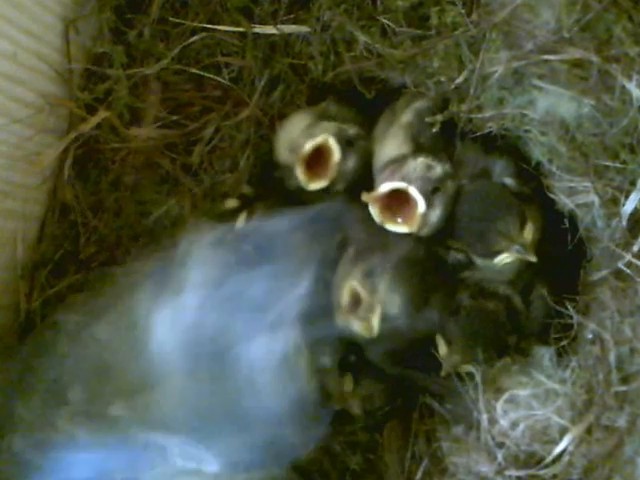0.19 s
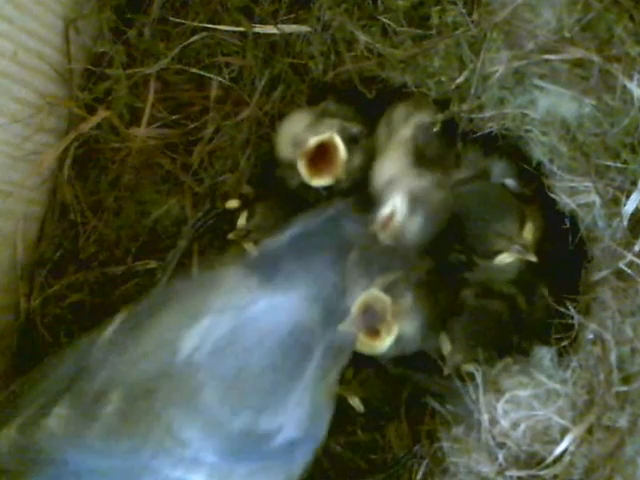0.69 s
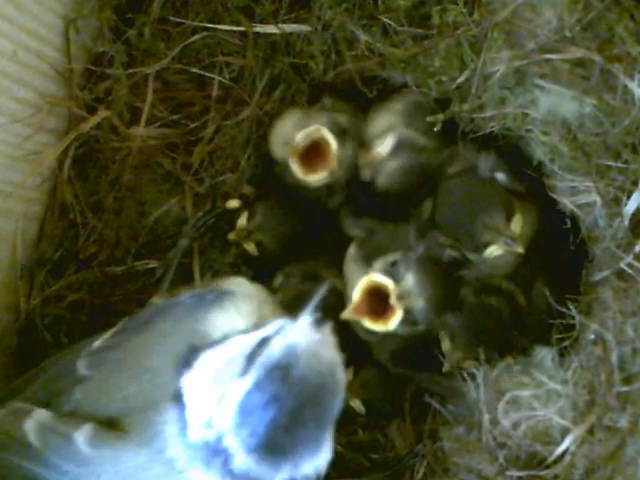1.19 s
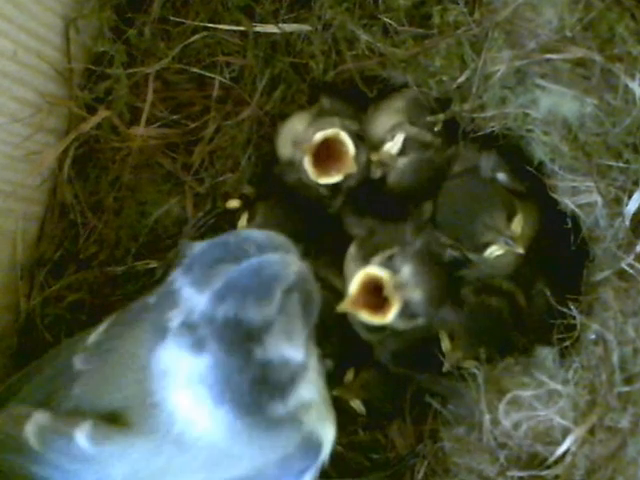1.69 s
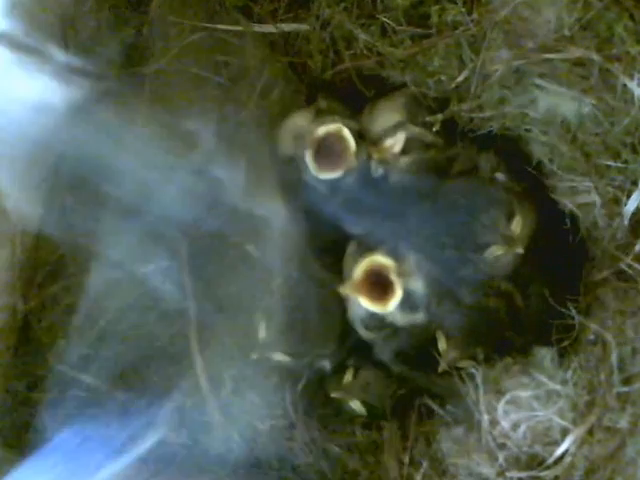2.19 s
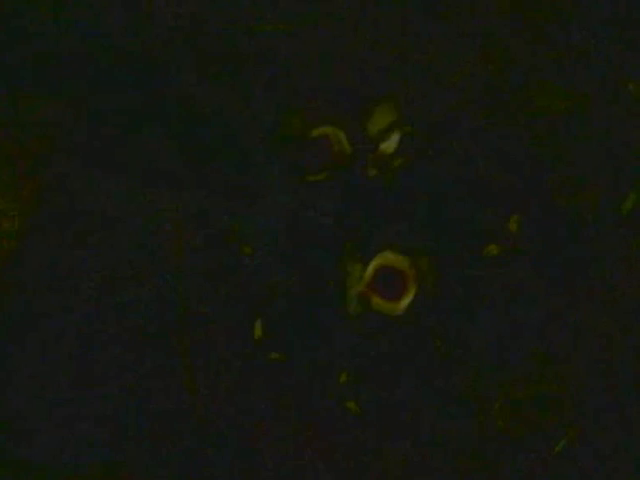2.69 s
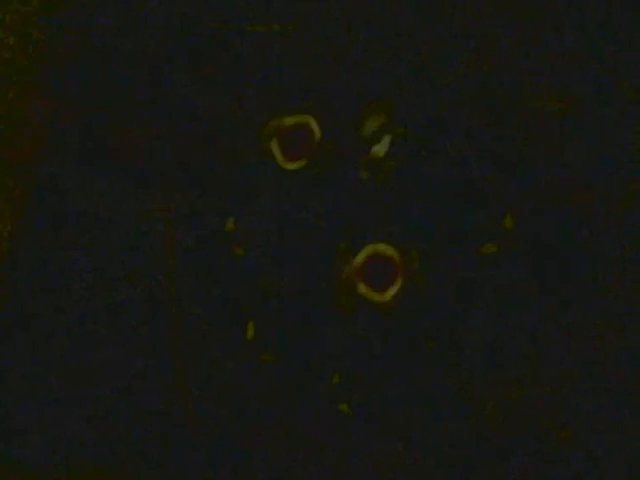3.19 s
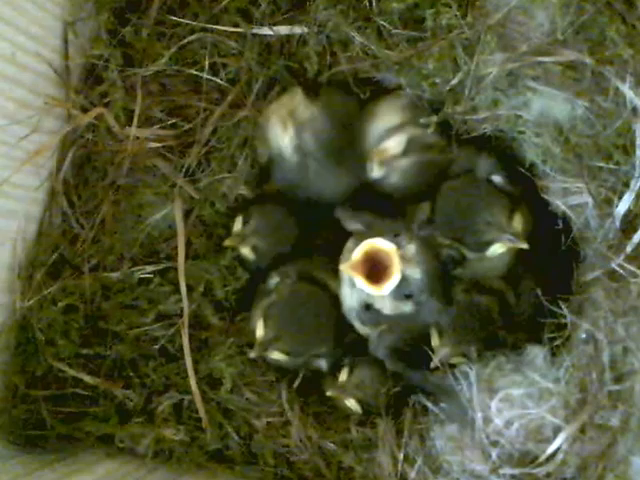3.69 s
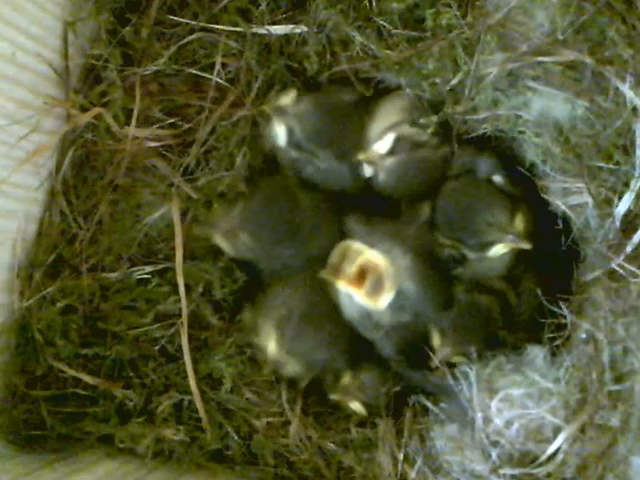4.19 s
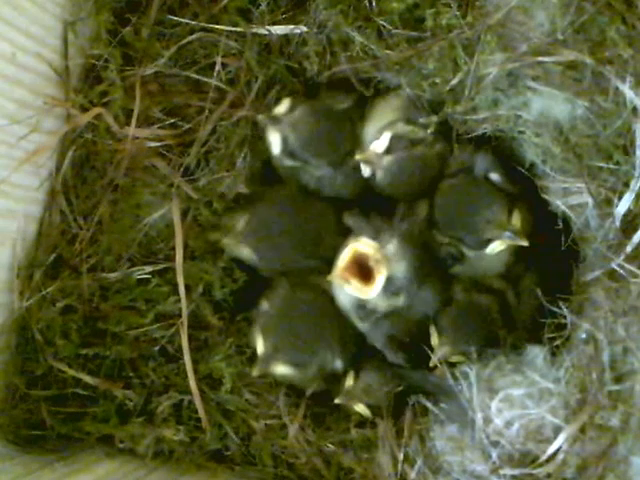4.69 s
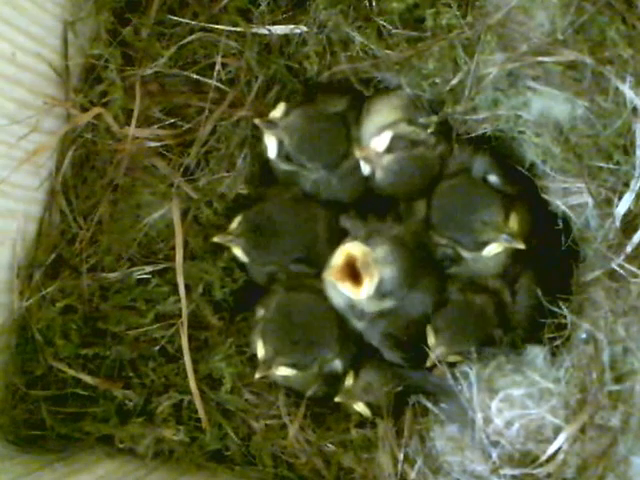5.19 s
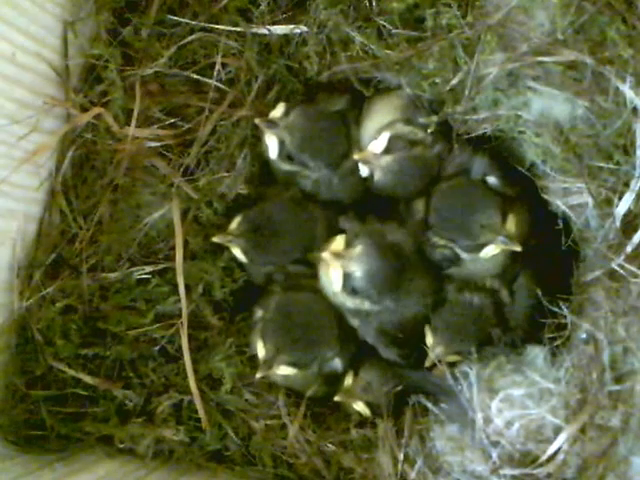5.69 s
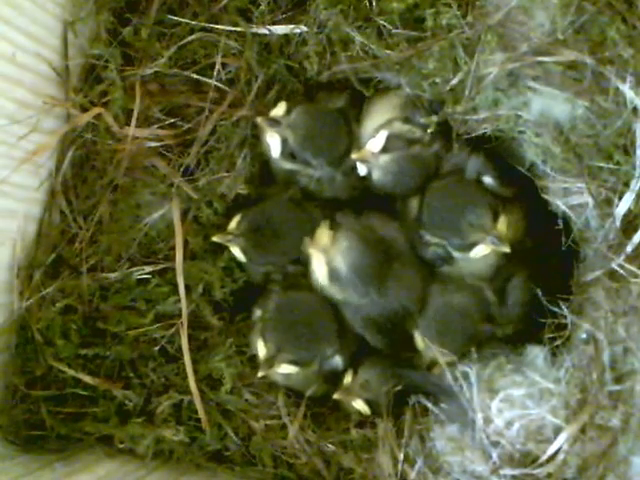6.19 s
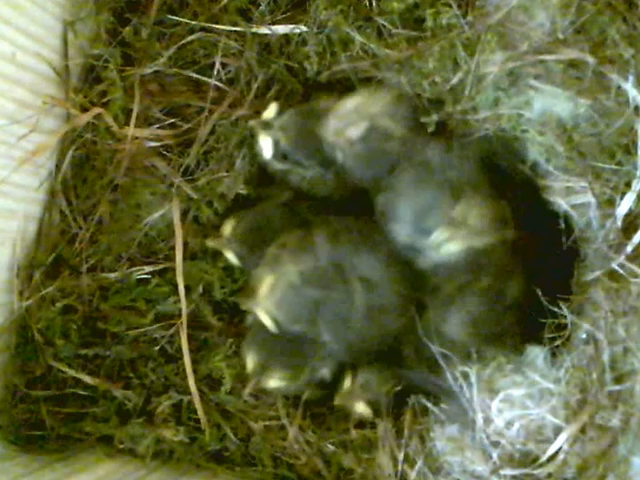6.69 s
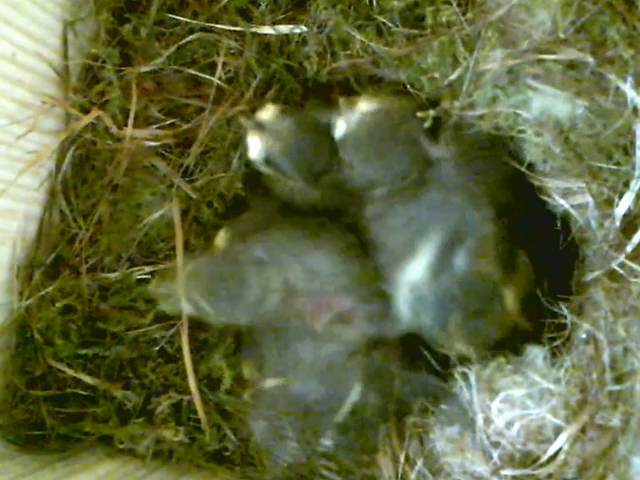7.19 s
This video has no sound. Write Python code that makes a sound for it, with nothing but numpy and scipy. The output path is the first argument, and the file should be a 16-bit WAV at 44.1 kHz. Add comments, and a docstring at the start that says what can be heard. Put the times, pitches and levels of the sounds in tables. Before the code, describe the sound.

Crowded nestlings beg with harsh, rasping high cheeps and buzzy chirps inside a small nest box, first frantic, then thinning to separate shrill calls.

```python
"""Nestlings begging in a nest box

Rasps (chaotic tone and throbbing noise), two-voiced buzzes, chirps and short octave-rich notes (harmonic
stacks) and thin whistles overlap close to one microphone. The box air hums low (shaped noise), claws knock
on the wood (dying modes and scrapes) and bodies shuffle in the moss (dull noise bursts).
"""
import sys
import numpy as np
from scipy import signal
from scipy.fft import rfft, irfft, next_fast_len
from scipy.io import wavfile
from scipy.ndimage import uniform_filter1d

SR = 44100
rng = np.random.default_rng(int(sys.argv[2]) if len(sys.argv) > 2 else 0)


def wav_record(signal):
    """Record a signal, one row per channel, as 16-bit PCM in the file named by sys.argv[1]."""
    frames = np.transpose(np.atleast_2d(signal))
    bounded = np.clip(frames, -1, 1)
    # unit amplitude maps onto the largest positive 16-bit level
    quanta = np.round(bounded * 32767).astype(np.int16)
    wavfile.write(sys.argv[1], SR, quanta)


N = 329868


def gain_of(db):
    """Decibels to an amplitude factor."""
    return 10 ** (np.asarray(db) / 20)


def evened(x):
    """Scales to rms 1."""
    return x / np.sqrt(np.mean(x ** 2) + 1e-20)


def read(points, hz):
    """Spectrum table interpolated over log frequency."""
    table_hz, value = np.transpose(points)
    return np.interp(np.log(hz + 1), np.log(table_hz + 1), value)


def add(mix, s, sound):
    """Mixes a sound in at time s, in place."""
    part = mix[round(s * SR):][:len(sound)]
    part += sound[:len(part)]


def coloured(x, gain):
    """Filters x by a gain given as a function of Hz."""
    size = next_fast_len(len(x) + 512)
    return irfft(rfft(x, size) * gain(np.fft.rfftfreq(size, 1 / SR)), size)[:len(x)]


def wander(noise, top_hz):
    """Slow random drift of rms 1: noise low-passed near top_hz."""
    return evened(coloured(noise, lambda hz: 1 / (1 + (hz / top_hz) ** 4)))


def peak(hz, mid_hz, width_hz):
    """Resonance curve of height 1."""
    return 1 / (1 + (2 * (hz - mid_hz) / width_hz) ** 2)


# hum swells, before the lumps: (time [s], level [dB])
HUM_SWELLS = [(0, -43), (.5, -31.5), (0.899, -39), (1.75, -41.5), (1.98, -26.5), (2.148, -38), (6.2, -40),
              (7.48, -39.5)]
# rumble spectrum, before the cavity resonance: (frequency [Hz], relative density [dB])
HUM_SPECTRUM = [(18, -44), (30, -25), (249, -3.5), (315, -15), (420, -37), (709, -23.5), (1020, -43.5),
                (1510, -33.5), (1680, -41.5), (15500, -57)]


def hum():
    """Outside rumble swells in the air cavity of the box, resonant near 211 Hz; it comes in lumps."""
    s, db = np.transpose(HUM_SWELLS)
    swell_db = np.interp(np.arange(N) / SR, s, db)
    lumps = gain_of(swell_db + 3.6 * wander(rng.standard_normal(N), 9.0))

    def cavity(hz):
        return gain_of(read(HUM_SPECTRUM, hz)) * (1 + 2.66 * peak(hz, 211.5, 28))

    return lumps * evened(coloured(rng.standard_normal(N), cavity))


# nestlings shuffle in the moss: (time [s], level before the fade window [dB])
SHUFFLES = [(2.22, -32.5), (6.3, -35.5), (6.53, -38.5), (6.71, -34.5), (6.985, -45), (7.035, -40.5),
            (7.16, -47), (7.365, -41)]


def shuffles():
    """Short dull rustles of bodies against the lining: noise around 648 Hz."""
    out, size = np.zeros(N), round(.035 * SR)
    for s, db in SHUFFLES:
        rustle = evened(coloured(rng.standard_normal(4000), lambda hz: peak(hz, 648, 480) ** 2))
        add(out, s, gain_of(db) * rustle[:size] * np.hanning(size))
    return out


def ring(modes, rise_s):
    """Dying modes after a soft blow."""
    t = np.arange(8000) / SR
    tones = sum(gain_of(db - 60 * t / t60) * np.sin(2 * np.pi * hz * t) for hz, db, t60 in modes)
    return (1 - np.exp(-t / rise_s)) * tones


# claws on the wood: (time [s], gain of the thump [dB], gain of wall ring and scrape [dB])
KNOCKS = [(2.526, -13, -16), (2.74, -51, -27), (2.904, -15, -20.5), (2.928, 0, -18), (3.206, -4.5, -26),
          (3.229, -0.5, -23), (3.254, -6.5, -15.5), (3.279, -12, -21.5), (3.574, -28, -19),
          (3.599, -7, -18), (3.624, -4.5, -38), (3.647, 8, -44), (3.689, -4, -46)]
# modes of the box air: (frequency [Hz], relative level [dB], t60 [s])
AIR_MODES = [(200.3, 12, 0.044), (271, -1.5, 0.05), (88.2, -7, 0.082)]
# modes of the wall: (frequency [Hz], relative level [dB], t60 [s])
WALL_MODES = [(538.7, 2, 0.12), (496, -10, 0.062)]


def knocks():
    """Each blow pushes the air of the box, rings a wall and scrapes briefly."""
    out, t = np.zeros(N), np.arange(8000) / SR
    for s, thump_db, wall_db in KNOCKS:
        scrape = coloured(rng.standard_normal(8000), lambda hz: peak(hz, 330, 5000) ** 2)
        scrape = scrape * gain_of(-60 * t / 0.071) * np.minimum(t * 100, 1)  # 10 ms rise
        wall = ring(WALL_MODES, rise_s=0.0055) + gain_of(11) * scrape
        add(out, s, gain_of(thump_db) * ring(AIR_MODES, rise_s=0.029) + gain_of(wall_db) * wall)
    return out


def phase(length, pitches_hz, flick_hz, waver_hz, warble_hz, flick_s=0.0024):
    """Running phase of a note that passes through its pitches, warbles, wavers and flicks at the end."""
    t = np.arange(round(length * SR)) / SR
    hz = np.interp(t / length, np.linspace(0, 1, len(pitches_hz)), pitches_hz)
    hz = uniform_filter1d(hz, size=150, mode="nearest")
    hz = hz + flick_hz * np.exp((t - length) / flick_s)
    hz = hz + waver_hz * wander(rng.standard_normal(6000), 43)[:len(t)]
    hz = hz + warble_hz * np.sin(2 * np.pi * 52 * (t - length))
    return 2 * np.pi * np.cumsum(hz) / SR


def partials(turn, levels_db):
    """Harmonics of one phase."""
    return np.sqrt(2) * sum(gain_of(db) * np.sin((k + 1) * turn) for k, db in enumerate(levels_db))


def swell(size):
    """Envelope with a rounded top, a little past the middle."""
    return np.sin(np.pi * np.linspace(0, 1, size) ** 1.3) ** .6


# thin whistles: (time [s], length [s], first pitch [Hz], last pitch [Hz], gain [dB])
WHISTLES = [(0.052, 0.036, 5750, 6530, -17), (0.35, 0.035, 6930, 6800, -28), (0.71, 0.058, 5430, 5540, -35),
            (0.96, .085, 5600, 5830, -31), (1.544, 0.083, 5670, 6620, -31), (2.548, 0.022, 4970, 6420, -10),
            (2.379, .025, 6120, 5250, -14.5), (2.201, .075, 5700, 6370, -26.5),
            (2.811, 0.028, 6400, 5930, -41), (3.682, .042, 5900, 5900, -24), (3.968, 0.03, 5190, 6130, -7),
            (4.197, 0.059, 5850, 6200, -33), (4.567, .06, 6400, 6040, -35.5), (4.788, .1, 5800, 6540, -28),
            (5.039, .056, 5880, 6140, -33), (5.57, 0.051, 5900, 5800, -35),
            (5.882, 0.09, 6540, 5900, -26.5), (5.925, 0.021, 4450, 4240, -40),
            (6, 0.039, 6420, 5980, -26.5), (6.2, 0.052, 7200, 6960, -35), (6.57, 0.092, 2120, 1940, -54),
            (6.58, 0.029, 6220, 6430, -33), (6.666, 0.11, 7500, 6200, -44), (6.737, .053, 5720, 6030, -31),
            (6.794, .092, 3690, 3550, -47.5), (6.89, 0.023, 3430, 5950, -14),
            (6.95, 0.064, 7250, 6630, -34), (6.977, 0.066, 5650, 6000, -32.5),
            (7.19, .062, 6500, 7330, -28), (7.234, 0.076, 5960, 5880, -33.5),
            (7.389, 0.087, 2500, 2640, -46.5)]
# wide air noise, also in the rasps: (frequency [Hz], relative density [dB])
BREATH_SPECTRUM = [(450, -47), (750, -34), (1200, -28), (1900, -32), (2700, -28), (5300, -16), (8800, -19),
                   (10400, -31), (12300, -32.5), (15500, -40.5)]


def whistle(s, length, first_hz, last_hz, level_db):
    """A wavering near-sine with a weak octave and a little air."""
    high = (first_hz + last_hz) / 12000  # higher notes waver more and show more octave
    turn = phase(length, [first_hz, last_hz], flick_hz=0, waver_hz=50 * high, warble_hz=80 * high)
    slow_db = 3.7 * wander(rng.standard_normal(6000), 90)[:len(turn)]
    fast_db = 1.2 * wander(rng.standard_normal(6000), 550)[:len(turn)]
    air = evened(coloured(rng.standard_normal(6000), lambda hz: gain_of(read(BREATH_SPECTRUM, hz))))
    tone = partials(turn, [0, -27 + 20 * np.log(high)]) * gain_of(slow_db + fast_db)
    note = tone + gain_of(-26.5) * air[:len(turn)]
    return gain_of(level_db) * note * signal.windows.tukey(len(turn), .25)


SHUT_HZ, SHUT_S, SHUT_FALL_HZ = 7260, 0.0093, 342


def shut(level_db):
    """The folds close on a short, clear, falling note."""
    turn = phase(SHUT_S, [SHUT_HZ, SHUT_HZ - SHUT_FALL_HZ], flick_hz=0, waver_hz=60, warble_hz=0)
    return gain_of(level_db) * np.sin(turn) * np.hanning(len(turn))


SCOOP, OVERSHOOT = .94, 1.03  # shares of the held pitch: a chirp starts under it and swings past it
# clear chirps: (time [s], length [s], held pitch [Hz], last pitch before the flick [Hz], gain [dB])
CHIRPS = [(0.035, 0.059, 3135, 3620, -26.5), (0.122, 0.046, 3156, 3200, -24.5),
          (0.227, 0.052, 3044, 3600, -26), (0.796, 0.053, 3030, 3250, -28),
          (0.988, 0.044, 3140, 3300, -27.5), (1.154, 0.047, 3010, 3930, -27.5),
          (1.33, 0.054, 3040, 3370, -26.5), (1.5, 0.052, 3046, 3740, -27), (1.667, 0.032, 3024, 3600, -27),
          (1.826, 0.057, 3090, 3370, -26), (1.998, 0.061, 3130, 3080, -25), (2.261, 0.019, 3120, 3520, -33),
          (2.622, 0.017, 3080, 3400, -28.5), (2.779, 0.04, 3095, 4000, -28.5),
          (3.281, 0.017, 2960, 3850, -27.5), (3.67, 0.016, 2990, 3610, -33), (4.25, 0.033, 3070, 3670, -29),
          (4.387, 0.034, 3040, 3400, -32), (7.186, 0.013, 3255, 3550, -33.5)]


def chirp(s, length, held_hz, last_hz, level_db):
    """A clear stack of four harmonics with an upward flick and a closing note."""
    pitches_hz = [SCOOP * held_hz, OVERSHOOT * held_hz, held_hz, held_hz, held_hz, last_hz]
    turn = phase(length, pitches_hz, flick_hz=948, waver_hz=38.4, warble_hz=94.5, flick_s=0.00364)
    note = partials(turn, [5.0, 0, -3.5, -12]) * signal.windows.tukey(len(turn), .3)
    note = np.append(note, np.zeros(round(SHUT_S * SR)))
    add(note, length - .004, shut(level_db=15.5))
    return gain_of(level_db) * note


# short notes with a strong octave; most glide up steeply, the last stays nearly level:
# (time [s], length [s], first pitch [Hz], last pitch [Hz], gain [dB])
OCTAVE_NOTES = [(2.226, 0.034, 2880, 3870, -23.5), (2.547, 0.008, 2700, 3400, -31),
                (2.603, 0.023, 3980, 4460, -28), (3.942, 0.035, 3034, 4560, -19.5),
                (6.059, 0.041, 3590, 3570, -19)]


def octave_note(s, length, first_hz, last_hz, level_db):
    """A short, slightly hoarse note with a strong octave; its pitch moves faster in the second half."""
    middle_hz = first_hz + 0.39 * (last_hz - first_hz)
    turn = phase(length, [first_hz, middle_hz, last_hz], flick_hz=0, waver_hz=40.4, warble_hz=0)
    hoarse = gain_of(1.2 * wander(rng.standard_normal(6000), 300)[:len(turn)])
    return gain_of(level_db) * partials(turn, [-1, -2, -16]) * hoarse * swell(len(turn))


PARENT_GONE_S = 3.8
SWEEP_S, SETTLE_SHARE = 0.0037, 0.17  # time constant of the final sweep; share of the pitch change left midway
HOARSE_RAD, ALONE_HOARSE_RAD = .12, .4  # rms of the fast phase shake, with and without the parent
# both sides of the syrinx lock on notes: (time [s], length [s], first pitch [Hz], last pitch [Hz],
# upper voice above by [Hz], final sweep [Hz], sum tones [dB], gain [dB])
BUZZES = [(0.42, 0.053, 3330, 3500, 459, 104, 7, -16), (.495, 0.045, 3600, 3440, 545, -300, -24, -17.5),
          (0.595, 0.104, 3363, 3537, 488, -150, 4, -14), (1.259, 0.052, 3255, 3450, 480, 498, 7, -19),
          (1.424, 0.079, 3340, 3640, 385, 52, 3.5, -14), (2.152, 0.069, 3375, 3500, 501, 1400, 12, -20.5),
          (2.331, 0.084, 3340, 3390, 423.5, 702, 5, -13.5), (2.517, 0.08, 3430, 3430, 298, -100, 5.5, -14),
          (2.715, 0.088, 3330, 3373, 299, -52, -3.5, -15), (3.387, 0.051, 3310, 3375, 474, 302, 6, -19.5),
          (3.546, 0.059, 3350, 3480, 392, 606, 6, -15.5), (3.757, 0.063, 3200, 3450, 460, 502, -14, -19),
          (4.43, 0.05, 3400, 3700, 485, 96, -24, -27), (6.234, 0.11, 3385, 3596, 524, -350, -9, -20),
          (6.46, 0.11, 3360, 3580, 517, -400, -13, -19.5)]


def buzz(s, length, first_hz, last_hz, apart_hz, sweep_hz, sums_db, level_db):
    """Two voices a little apart; coupling adds sum tones. The upper sweeps up alone, or both droop."""
    settled_hz = last_hz - SETTLE_SHARE * (last_hz - first_hz)
    pitches_hz = [first_hz, settled_hz, last_hz, last_hz]
    a = phase(length, pitches_hz, min(sweep_hz, 0), waver_hz=30.8, warble_hz=0, flick_s=SWEEP_S)
    gap = phase(length, [apart_hz, apart_hz], max(sweep_hz, 0), waver_hz=26.3, warble_hz=0, flick_s=SWEEP_S)
    b = a + gap
    hoarse_rad = HOARSE_RAD if s < PARENT_GONE_S else ALONE_HOARSE_RAD
    shake = hoarse_rad * wander(rng.standard_normal(6000), 280)[:len(a)]
    a, b = a + shake, b - shake
    voices = np.sin(a) + gain_of(-0.5) * np.sin(b)
    sums = gain_of(sums_db) * (0.46 * np.sin(a + b) + np.sin(2 * b))
    thirds = gain_of(sums_db - 19) * (np.sin(3 * a) + np.sin(3 * b))
    flutter = gain_of(2.2 * wander(rng.standard_normal(6000), 98)[:len(a)])
    return gain_of(level_db) * (voices + sums + thirds) * flutter * swell(len(a))


def patchy(x, depth_db):
    """The throat never holds still: the colour drifts in patches of time and pitch."""
    z = signal.stft(x, nperseg=256, noverlap=192)[2]
    patches = uniform_filter1d(rng.standard_normal(z.shape), size=4, axis=0)
    patches = uniform_filter1d(patches, size=14, axis=1)
    return signal.istft(z * gain_of(depth_db * evened(patches)), nperseg=256, noverlap=192)[1][:len(x)]


RISE_DB, ALONE_RISE_DB = 11.5, 22.5  # with the parent gone, calls start more softly
RISE_BEND, SAG_DB_PER_S, RELEASE_S, RELEASE_DB = 1.84, 92, 0.014, 22.5


def effort(t, top, peak_db, rise_db):
    """Effort in dB: swells to the loudest moment, sags, and is cut off at the end."""
    top_s = np.clip(top, .05, .95) * t[-1]
    rise = rise_db * np.maximum(1 - t / top_s, 0) ** RISE_BEND
    sag = SAG_DB_PER_S * np.maximum(t - top_s, 0)
    release = np.maximum(1 - (t[-1] - t) / min(RELEASE_S, t[-1] - top_s), 0)
    return peak_db - rise - sag - RELEASE_DB * release


# throat bands
UPPER_WIDTH_HZ, MIDDLE_SHARE, MIDDLE_HZ, MIDDLE_WIDTH_HZ = 1900, .35, 6050, 450
# harsh calls: (time [s], length [s], loudest moment [share of length], peak effort [dB],
# lower band before its onset and effort gain [dB], upper band centre [Hz])
RASPS = [(0.0, 0.013, 0.48, -4.5, -7.5, 7520), (0.012, .13, 0.43, -16, -7.5, 7700),
         (0.146, 0.024, 0.8, -12, -8, 7520), (0.191, 0.12, 0.61, -13, -4, 7550),
         (0.295, 0.088, 0.37, -19, -6, 7500), (0.371, .16, 0.72, -14, -3, 7690),
         (0.571, 0.14, 0.66, -14, -3.5, 7770), (0.751, 0.11, 0.23, -26, -2, 7570),
         (0.936, .26, 0.6, -18.5, -11, 7740), (1.195, 0.16, 0.63, -19, -12, 8050),
         (1.379, 0.14, 0.62, -16.5, -25, 7750), (1.524, 0.037, 0.33, -20.5, 5, 7460),
         (1.625, 0.14, 0.57, -14.5, -12, 7770), (1.793, 0.05, 0.56, -22, -2, 7300),
         (1.857, 0.042, 0.14, -18.5, 6, 7280), (1.909, .16, 0.72, -15, -10, 7950),
         (2.127, .17, 0.35, -14, -10, 7610), (2.309, 0.14, 0.55, -15.5, -9, 7370),
         (2.427, 0.057, 0.22, -19, -5, 7120), (2.48, .17, 0.39, -13.5, -7.5, 7160),
         (2.698, 0.11, 0.64, -12, -11, 7410), (2.931, 0.14, 0.95, -22.5, -11, 7560),
         (3.111, 0.11, 0.76, -18.5, -40, 8120), (3.212, 0.068, 1, -21, -9, 7460),
         (3.327, .11, 0.99, -16, -39, 8230), (3.505, .12, 0.46, -15, -13, 7340),
         (3.643, 0.054, 0.61, -23.5, -7, 7060), (3.719, .11, 0.8, -11, -10, 7220),
         (3.905, 0.091, 0.31, -19, -10, 6400), (3.953, 0.055, 0.1, -12, -36, 7500),
         (3.998, 0.069, 0.82, -28, -7, 7460), (4.118, 0.1, 0.7, -25.5, -7.5, 6950),
         (4.206, 0.067, 0.44, -25.5, -6.5, 7540), (4.359, 0.039, 0.78, -19.5, -6, 7600),
         (4.399, 0.039, 0.24, -10.5, -6, 7430), (4.424, 0.071, 0.27, -23.5, -15, 7030),
         (4.49, 0.084, 0.88, -13, -6.5, 7420), (4.633, .11, 0.79, -11.5, -7.5, 7310),
         (4.844, 0.11, 0.68, -15.5, -7, 7660), (4.92, 0.074, 0.69, -27, 3, 7120),
         (5.117, 0.065, 0.25, -24, -8.5, 7070), (5.162, 0.086, 0.52, -28.5, -4, 6810),
         (5.222, 0.053, 0.62, -18.5, -8.5, 5800), (5.29, 0.086, 0.74, -13, -6.5, 7500),
         (5.356, 0.058, 0.35, -12.5, -13, 5870), (5.446, 0.07, 0.72, -12, -5.5, 6880),
         (5.581, 0.094, 0.63, -11, -9, 6470), (5.809, 0.096, 0.67, -12, -11, 6750),
         (6.012, 0.082, 0.29, -29.5, -7, 6180), (6.203, 0.14, 0.68, -16, -12, 7040),
         (6.459, 0.1, 0.57, -15.5, -6, 6760), (6.653, 0.094, 0.6, -19, -8, 6770),
         (6.845, 0.11, 0.46, -16, -14, 6900), (6.944, 0.11, 0.079, -27.5, -12, 6840),
         (7.127, 0.14, 0.36, -29.5, -8, 6550), (7.244, 0.15, 0.61, -30, -10, 7830),
         (7.384, 0.1, 0.32, -48.5, -24, 8040)]


def rasp(s, length, top, peak_db, lower_db, upper_hz):
    """A chaotic syrinx: an unsteady, slipping tone and throbbing noise in two bands, over wide air noise."""
    air, high, low, throb, slip, catch = rng.standard_normal((12000, 6)).T
    u = np.linspace(0, 1, max(round(length * SR), 64))
    t = u * length
    effort_db = effort(t, top, peak_db, RISE_DB if s < PARENT_GONE_S else ALONE_RISE_DB)
    turn = np.pi * np.cumsum(upper_hz + 240 * wander(slip, 98.1)) / SR  # half the pitch of the upper band
    # a second voice beats with the tone
    beat = 1 + np.cos(2 * np.pi * np.cumsum(500 + 90 * wander(throb, 51)) / SR)
    grip = beat * gain_of(7.3 * np.tanh(wander(catch, 54)))  # the tone catches and lets go

    def upper_band(hz):
        middle = MIDDLE_SHARE * peak(hz, MIDDLE_HZ, MIDDLE_WIDTH_HZ)
        return peak(hz, upper_hz, UPPER_WIDTH_HZ) ** 2 + middle

    def lower_band(hz):
        return (peak(hz, 3440, 830) + 1.6 * peak(hz, 4340, 640)) * (1 - np.exp(-(hz / 2900) ** 8))

    def wide_band(hz):
        return gain_of(read(BREATH_SPECTRUM, hz)) * (1 + 0.54 * peak(hz, 10170, 1200))

    upper = coloured(high + .7 * grip * np.sin(2 * turn), upper_band)
    lower = coloured(low + 0.19 * grip * np.sin(turn), lower_band)
    wide = coloured(air + 0.011 * grip * np.sin(3 * turn), wide_band)
    rest = patchy(gain_of(lower_db) * evened(lower) + gain_of(-4.0) * evened(wide), depth_db=4.0)
    # lower and wide bands come in late and grow with effort
    late = (1 - np.exp(-t / 0.012)) * gain_of(0.36 * (effort_db - effort_db.max()))
    mix = evened(upper)[:len(u)] + late * rest[:len(u)]
    pip = 4.5 * np.exp(-t / 0.0018) * np.sin(2 * turn[:len(u)])  # the folds snap open on a clear note
    throbbing = gain_of(0.98 * wander(throb, 250)[:len(u)])
    call = gain_of(effort_db) * (mix + pip) * throbbing * np.minimum(t * 1000, 1)  # 1 ms rise
    add(call, max(length - SHUT_S, 0), shut(effort_db[-1] + 14))
    return call


def box(x):
    """The close, moss-damped walls give a very short tail; the nearest wall weakens two bands."""
    t = np.arange(4000) / SR
    tail = rng.standard_normal(4000) * gain_of(-60 * t / 0.033)
    near = coloured(x, lambda hz: 1 - .55 * peak(hz, 5300, 450) - .45 * peak(hz, 9300, 600))
    return near + gain_of(-13.0) * signal.oaconvolve(near, tail / np.linalg.norm(tail))[:N]


LOCK_DB = 2  # the rasps sink while the folds are locked on buzz notes


def scene():
    """All calls in the box over hum, knocks and shuffles, the same on both channels."""
    birds, locked = np.zeros(N), np.zeros(N)
    for row in RASPS:
        add(birds, row[0], rasp(*row))
    for s, length, *_ in BUZZES:
        add(locked, s, swell(round(length * SR)))
    birds = birds * gain_of(-LOCK_DB * locked)
    for voice, table in [(chirp, CHIRPS), (whistle, WHISTLES), (buzz, BUZZES), (octave_note, OCTAVE_NOTES)]:
        for row in table:
            add(birds, row[0], voice(*row))
    return np.tile(box(birds) + hum() + knocks() + shuffles(), (2, 1))


EDGE_HZ = 15700


def record(dry):
    """Peaks beyond full scale clip; the microphone drops the deep bass; then the band limit."""
    thin = signal.lfilter(*signal.butter(2, 65, "high", fs=SR), np.clip(dry, -1, 1))
    band_limit = signal.firwin(511, EDGE_HZ, window=("kaiser", 9), fs=SR)
    return signal.oaconvolve(thin, band_limit[None], "same")


dry = scene()
out = record(dry)
wav_record(out)
```